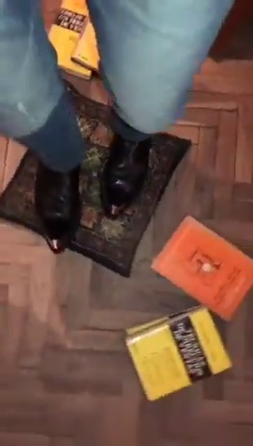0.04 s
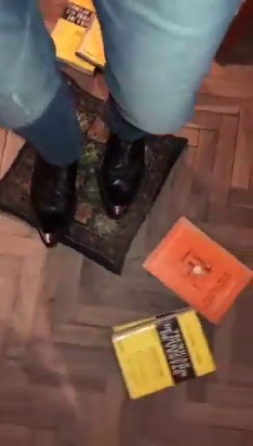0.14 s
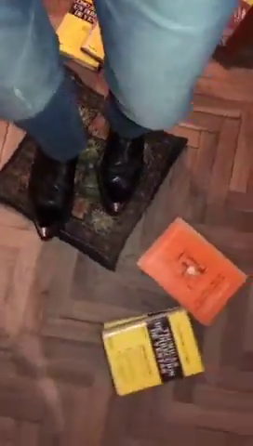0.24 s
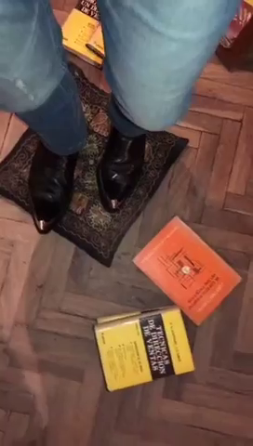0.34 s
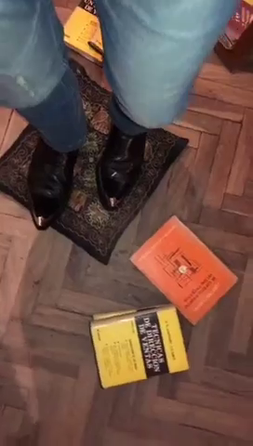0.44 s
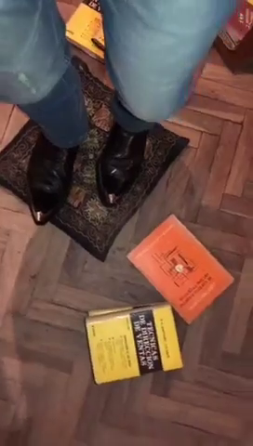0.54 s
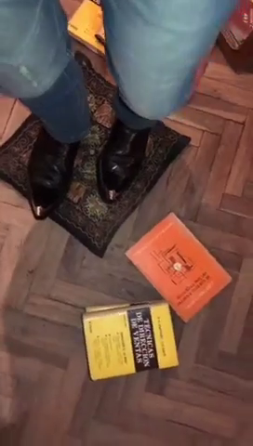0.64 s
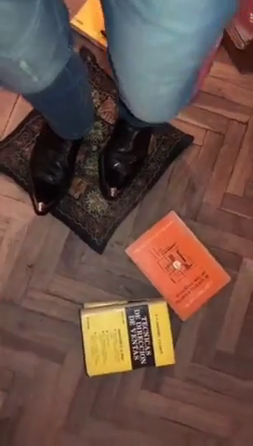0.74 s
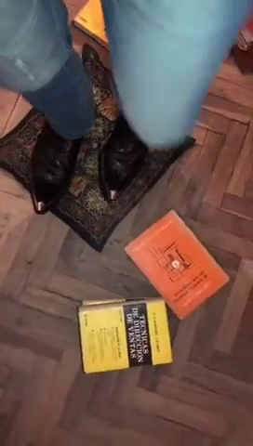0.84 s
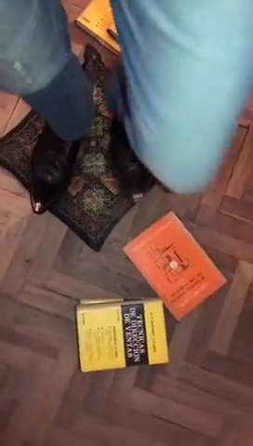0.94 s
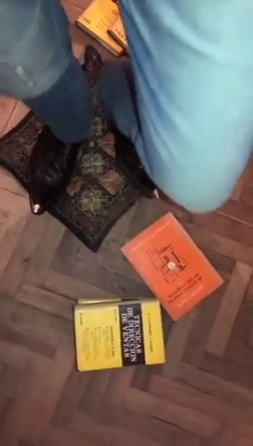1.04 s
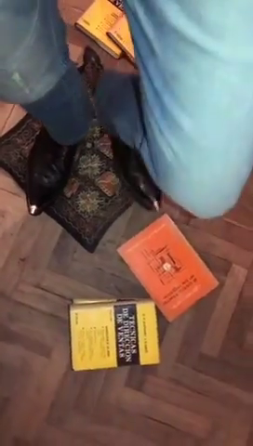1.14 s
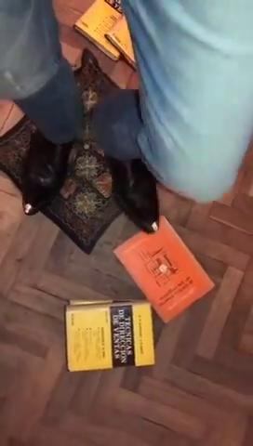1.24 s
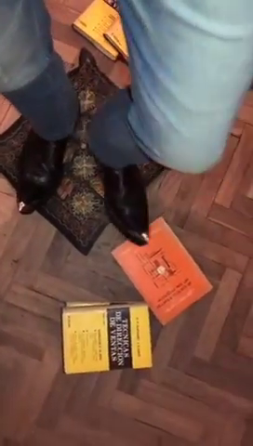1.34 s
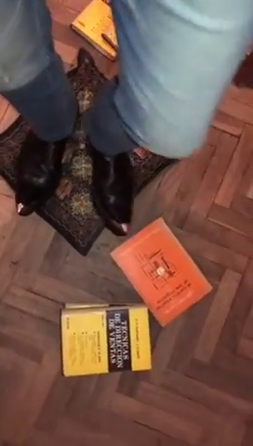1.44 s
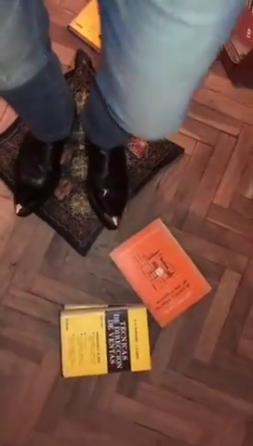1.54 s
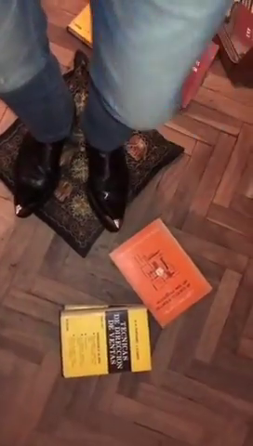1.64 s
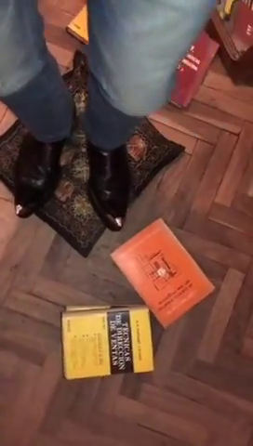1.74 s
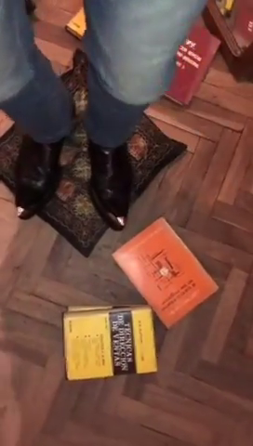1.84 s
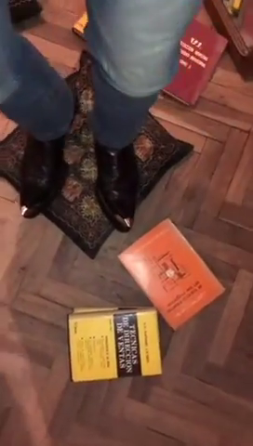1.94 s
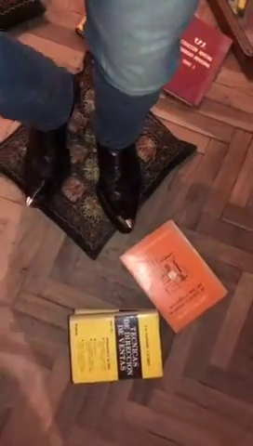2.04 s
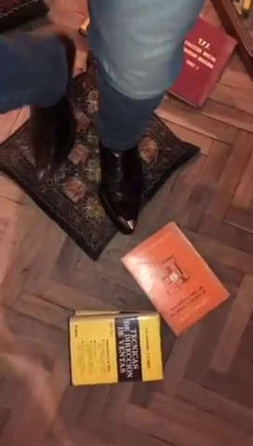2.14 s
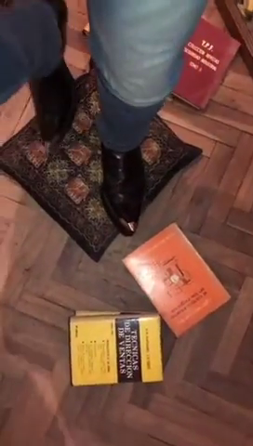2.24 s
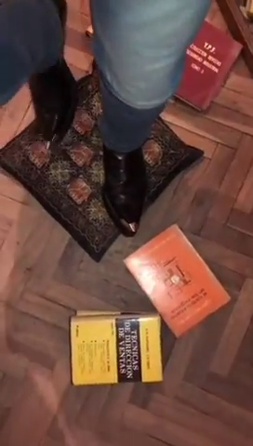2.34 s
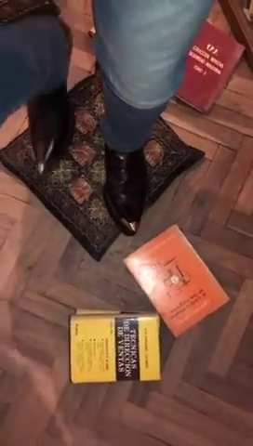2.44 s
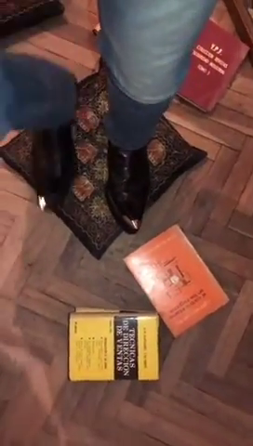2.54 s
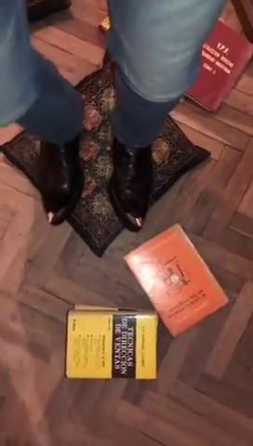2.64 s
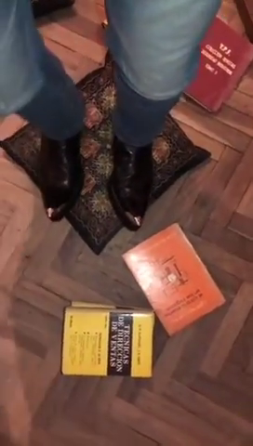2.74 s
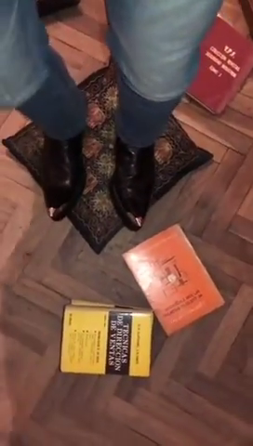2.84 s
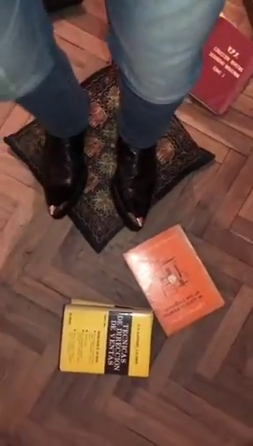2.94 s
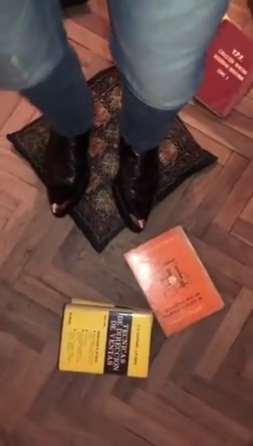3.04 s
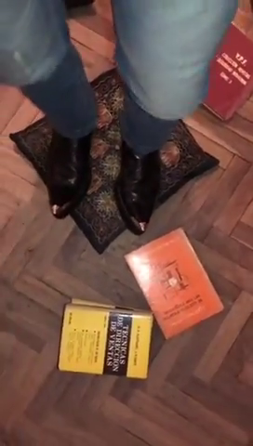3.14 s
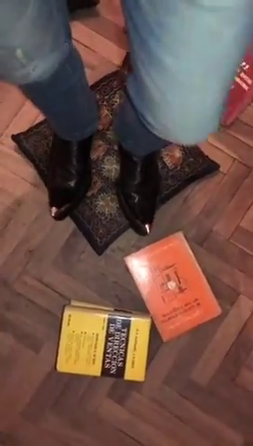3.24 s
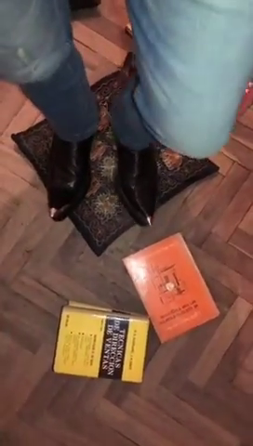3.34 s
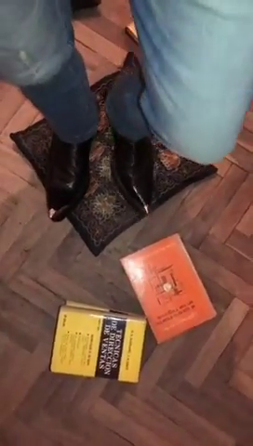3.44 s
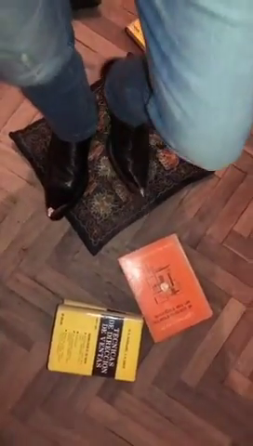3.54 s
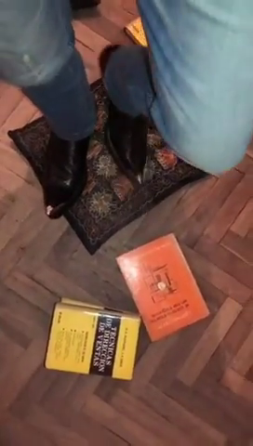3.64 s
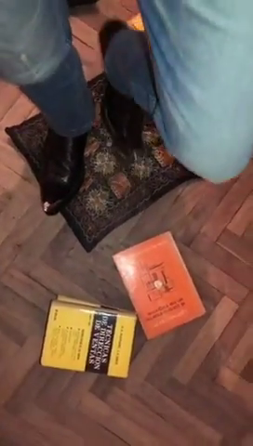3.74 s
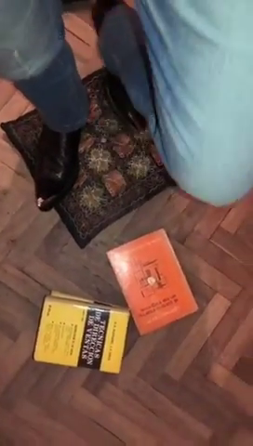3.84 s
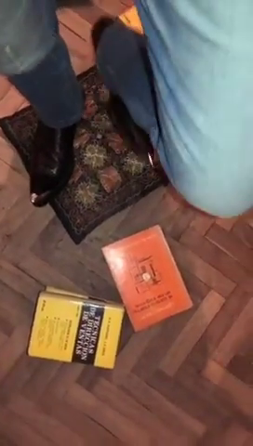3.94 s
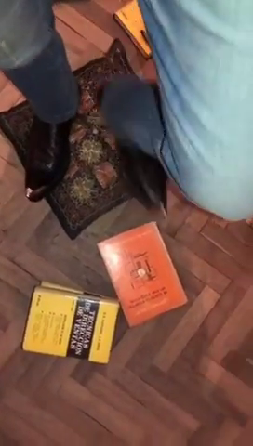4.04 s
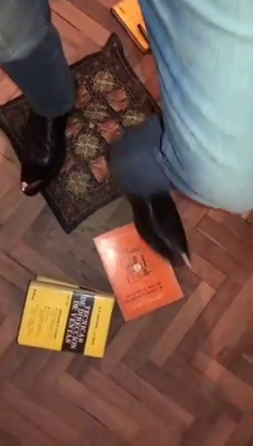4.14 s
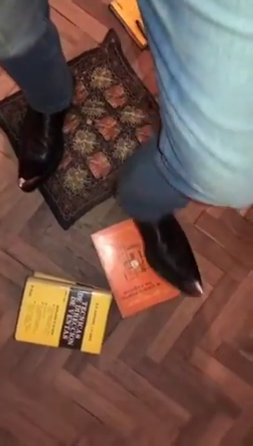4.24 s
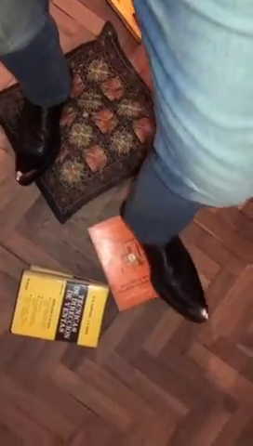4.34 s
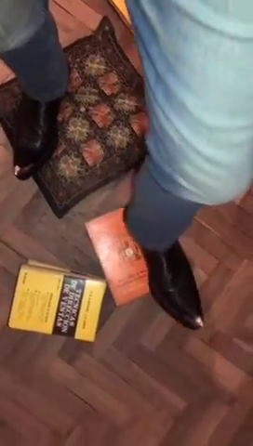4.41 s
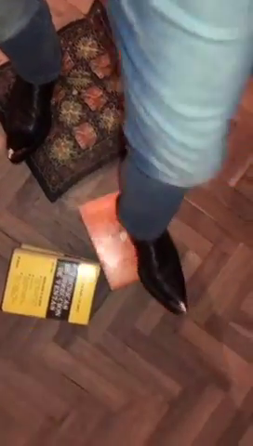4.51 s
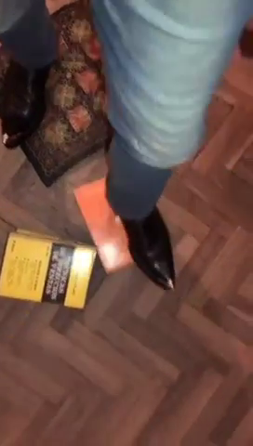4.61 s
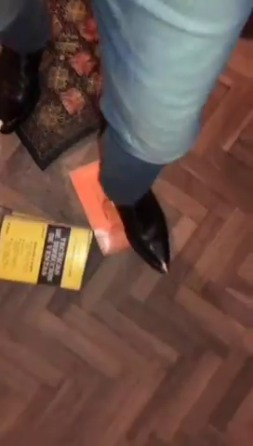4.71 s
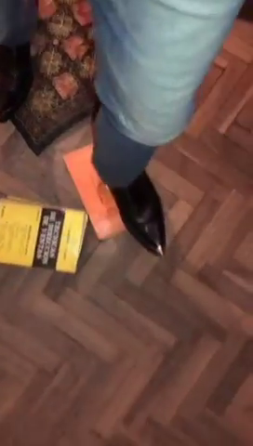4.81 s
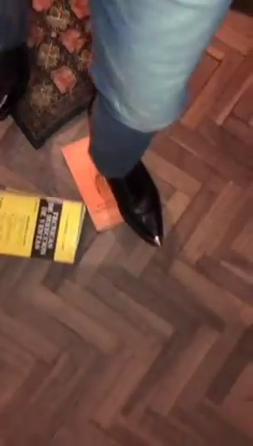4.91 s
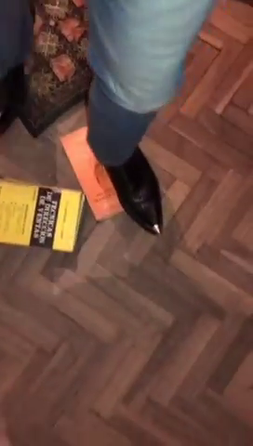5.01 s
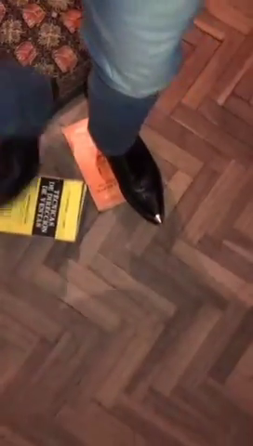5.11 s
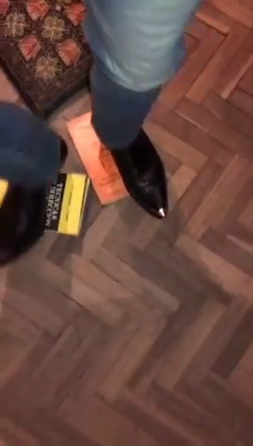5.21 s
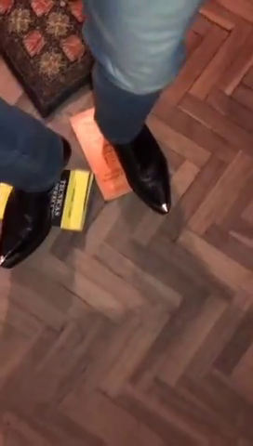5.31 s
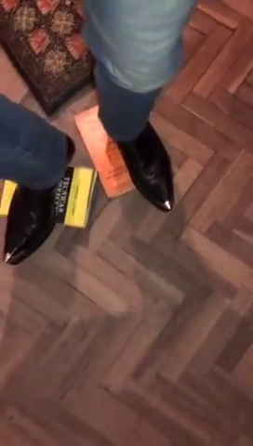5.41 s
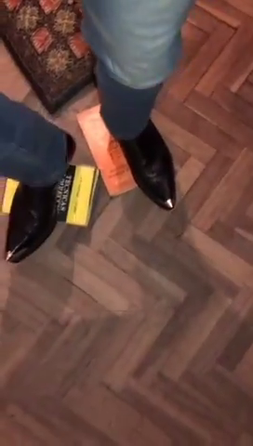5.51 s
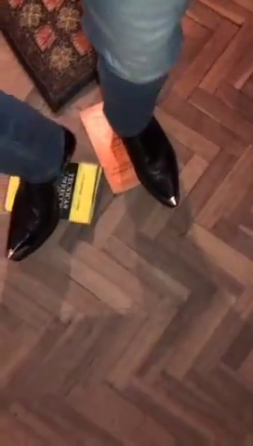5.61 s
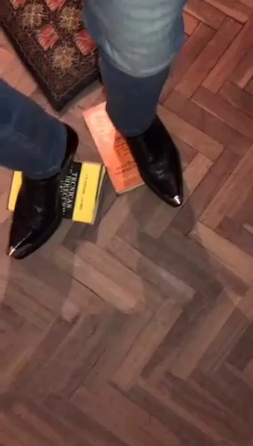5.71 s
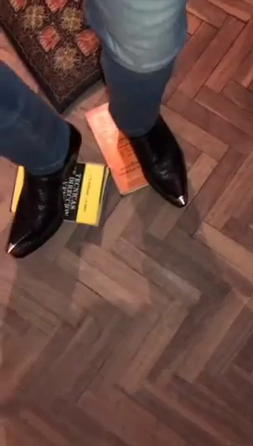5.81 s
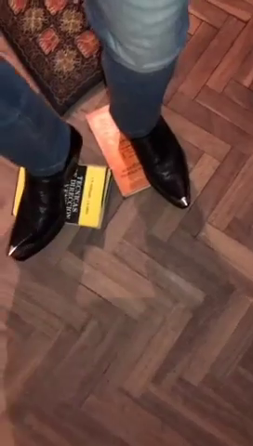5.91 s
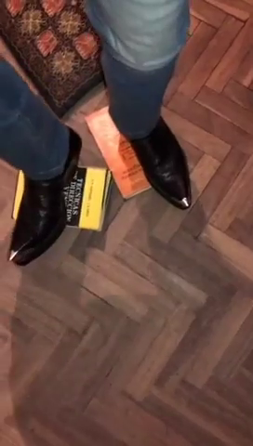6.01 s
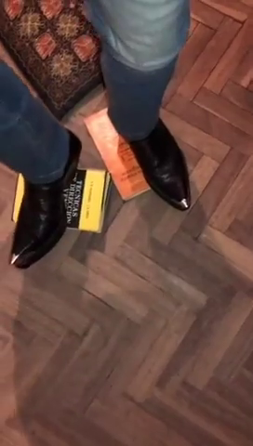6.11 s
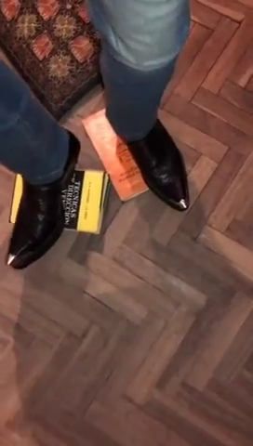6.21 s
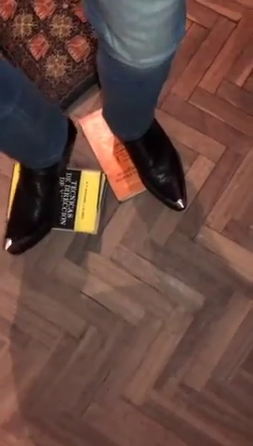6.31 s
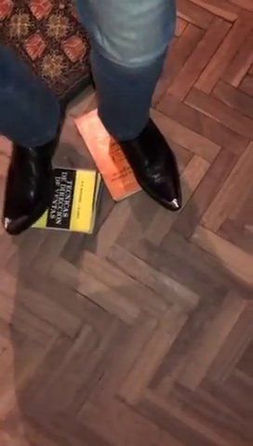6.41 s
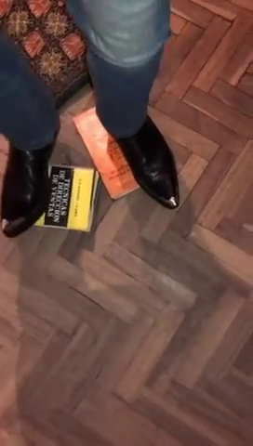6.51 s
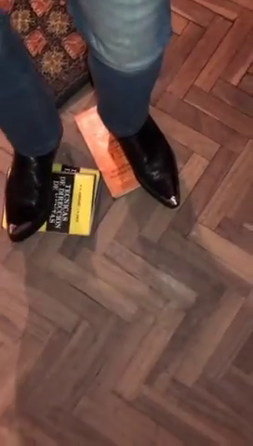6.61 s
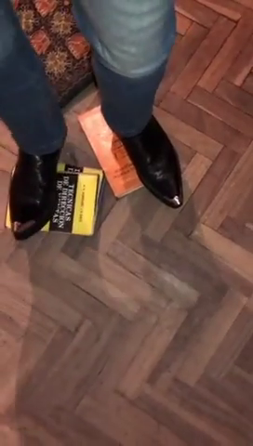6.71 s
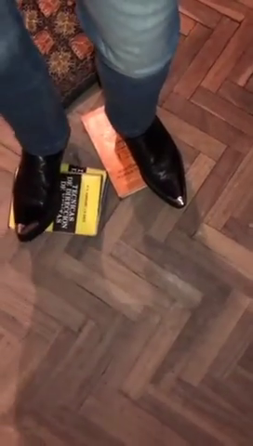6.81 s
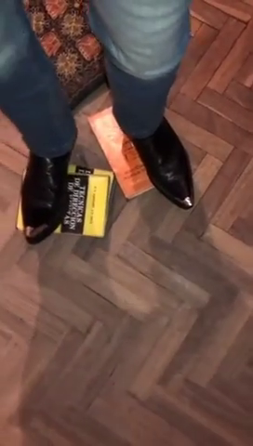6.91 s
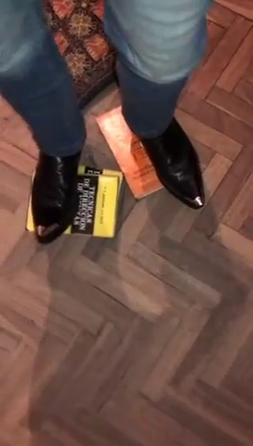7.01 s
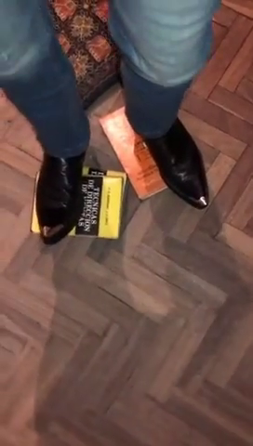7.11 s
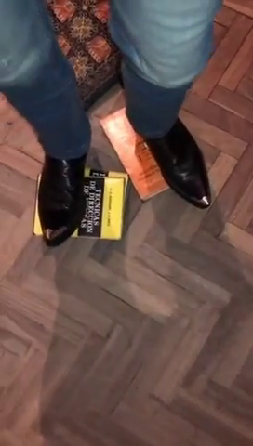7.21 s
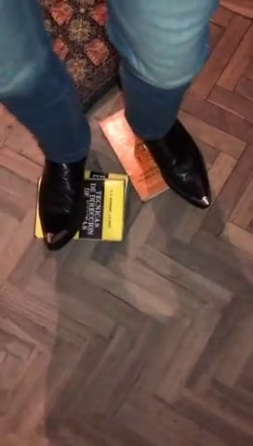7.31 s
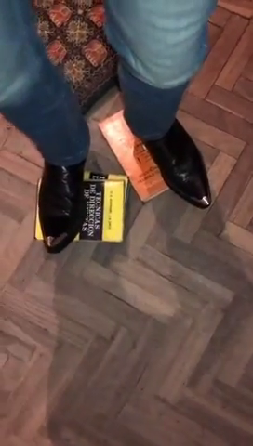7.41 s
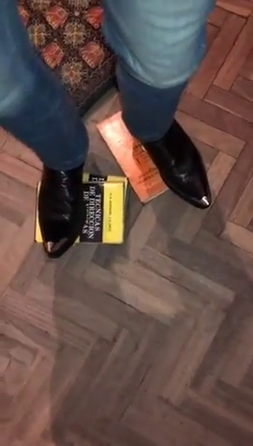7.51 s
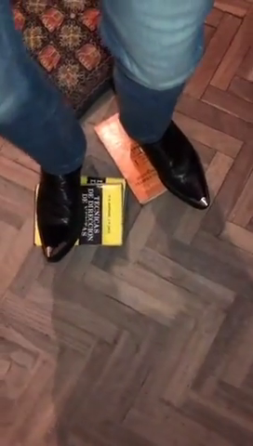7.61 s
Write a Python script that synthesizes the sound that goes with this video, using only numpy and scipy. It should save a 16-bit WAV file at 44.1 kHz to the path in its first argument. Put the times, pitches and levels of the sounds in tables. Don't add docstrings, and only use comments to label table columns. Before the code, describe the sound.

Soft cloth rustles and leather ticks in a quiet room, then three heel knocks through books into ringing floorboards, scuffs and one brief squeak.

```python
import sys
import numpy as np
from scipy import signal
from scipy.fft import rfft, irfft
from scipy.io import wavfile
from scipy.ndimage import uniform_filter1d

SR = 44100
rng = np.random.default_rng(int(sys.argv[2]) if len(sys.argv) > 2 else 0)


def boost(x):
    u = np.asarray(x, float) / 20
    return 10 ** u


def pcm_store(signal):
    levels = np.round(np.clip(np.atleast_2d(signal), -1, 1) * 32767)
    wavfile.write(sys.argv[1], SR, levels.astype(np.int16).T)


N = 337806


def rms_one(x):
    return x / np.sqrt(np.mean(x ** 2) + 1e-20)


def butter(x, order, hz, kind):
    return signal.sosfilt(signal.butter(order, hz, kind, fs=SR, output="sos"), x)


def coloured(x, spectrum):
    hz, db = np.transpose(spectrum)
    axis = np.log(np.maximum(np.fft.rfftfreq(N, 1 / SR), 1))
    gain = boost(np.interp(axis, np.log(hz), db, left=-80, right=-80))
    return rms_one(irfft(rfft(x) * gain, N))


def resonances(x, peaks):
    out = 0
    for k, (hz, width, db) in enumerate(peaks):
        r = np.exp(-np.pi * width / SR)
        push = [(1 - r * r) / 2, 0, (r * r - 1) / 2]
        memory = [1, -2 * r * np.cos(2 * np.pi * hz / SR), r * r]
        out = out + (-1) ** k * boost(db) * signal.lfilter(push, memory, x)
    return out


def ring(clicks, hz, t60):
    r, w = boost(-60 / (t60 * SR)), 2 * np.pi * hz / SR
    return signal.lfilter([0, np.sin(w)], [1, -2 * r * np.cos(w), r * r], clicks + 1e-18)


def snap(burst, db, top_hz):
    dying = burst * np.exp(-np.arange(len(burst)) / SR / 0.003)
    return boost(db) * butter(dying, 2, [600, top_hz], "band")


def grains(spread_db):
    return rng.standard_normal(N) * boost(spread_db * np.minimum(rng.exponential(1, N), 4))


def swells(rows, lag=0.):
    t, power = np.arange(0, N, 32) / SR - lag, 1e-15
    for s, hold, db, rise, fall in rows:
        early = np.maximum(s - t, 0) / max(rise, 1e-3)
        late = np.maximum(t - s - hold, 0) / max(fall, 1e-3)
        power = power + boost(db - 20 * (early + late)) ** 2
    return np.interp(np.arange(N) / 32, np.arange(len(t)), power)


def step(contacts, modes):
    force, crack, t = np.zeros(N), np.zeros(N), np.arange(1024) / SR
    noise = rng.standard_normal((8, len(t)))
    for (s, db, hard_hz, crack_db), burst in zip(contacts, noise):
        i = round(s * SR)
        now = slice(i, i + len(t))
        push = t * np.exp(-2 * np.pi * hard_hz * t)
        rebound = t * np.exp(-2 * np.pi * hard_hz * t / 6)
        force[now] += boost(db) * (push / push.sum() - 0.91 * rebound / rebound.sum())
        crack[now] += snap(burst, crack_db, 1500 + 1.88 * hard_hz)
        crack[now] += snap(burst, crack_db - 15, top_hz=14700)
    body = 0
    for k, (hz, db, t60) in enumerate(modes):
        body = body + (-1) ** (k // 2) * boost(db) * ring(force, hz, t60)
    return crack + butter(body, 2, 50, "high")


# start in seconds, blow in dB, hardness in Hz, crack in dB.
FIRST_STEP = [(4.658, -36.5, 2730, -35.5), (4.6594, -29, 1000, -34), (4.6663, -37, 700, -34),
              (4.6733, -37, 606, -41), (4.6815, -40, 790, -48), (4.7218, -37, 250, -48)]
SECOND_STEP = [(5.303, -33.5, 3100, -27.5), (5.3083, -27, 1200, -25), (5.314, -31, 800, -43),
               (5.3205, -27, 200, -44), (5.3232, -30, 900, -43), (5.337, -40, 400, -46),
               (5.365, -31, 600, -36)]
THIRD_STEP = [(6.598, -35, 3120, -36.5), (6.6005, -65.5, 1200, -42), (6.607, -38, 500, -45.5),
              (6.618, -37, 141, -55), (6.6485, -38, 2000, -36), (6.652, -52, 500, -58),
              (6.661, -40, 304, -55)]
# pitch in Hz, level in dB, time to fall 60 dB in seconds.
FIRST_RING = [(68, -4, 0.22), (142, -5, 0.45), (219, -17, 0.17), (290, 0, 0.2), (327, -9.5, 0.031),
              (400, -1, 0.15), (490, -10.5, 0.16), (590, 1, 0.034), (813, -22, 0.2), (950, 3.5, 0.034),
              (1280, -13, 0.058), (1600, -6, .04), (2700, 8.5, 0.0075)]
SECOND_RING = [(62, -1, 0.5), (76, 4, 0.24), (213.6, -8, 0.5), (155, -14, 0.4), (200, 5, 0.1),
               (305, -2, 0.3), (395, -14, 0.1), (422, -23, 0.4), (613, -15.5, 0.17), (693, -9.5, 0.14),
               (920, 2.5, 0.032), (1044, -8, 0.2), (1410, 0.5, 0.032), (1850, -23, 0.026)]
THIRD_RING = [(58.3, -14, 0.2), (75.2, 1, 0.23), (160.3, 5.5, 0.16), (398, -20, 0.33), (291, -21, 0.3),
              (435, 0.5, 0.02), (551, -6.5, 0.082), (800, -5, 0.03), (1000, 0.5, 0.026), (1400, 1.5, 0.014),
              (1870, -4, 0.018)]
# start in seconds, change in dB.
STILLING = [
    (4.684, -6),
    (5.345, -6),
    (6.72, -2),
]


def steps():
    t, out = np.arange(N) / SR, 0
    played = [(FIRST_STEP, FIRST_RING), (SECOND_STEP, SECOND_RING), (THIRD_STEP, THIRD_RING)]
    for (contacts, modes), (s, db) in zip(played, STILLING):
        landed = np.clip((t - s) / 0.004, 0, 1)
        out = out + step(contacts, modes) * boost(db * landed)
    return out


# full level reached in seconds, hold in seconds,
# level in dB, rise in seconds per 20 dB, fall in seconds per 20 dB.
CLOTH_BRUSHES = [(.175, 0.038, -60.5, 0.12, 0.1556), (.952, 0.041, -59, 0.06, 0.07),
                 (2.2, 0.045, -55, 0.1151, 0.09), (3.74, 0.089, -60.5, 0.42, -0.03),
                 (3.85, 0.021, -68.5, 0.72, -0.58), (4.97, 0.012, -60.5, -0.03, 0.03),
                 (5.64, 0.0057, -71, -0.15, 0.12)]
SOLE_DRAGS = [
    (2.095, 0.078, -55, 0.094, 0.17),
    (2.624, 0.039, -58, 0.011, 0.044),
    (2.724, 0.0067, -62.5, 0.13, 0.058),
    (3.43, 0.18, -56.5, 0.23, 0.37),
    (7.6, .06, -74.5, 0.051, .1),
]
TROUSER_RUSTLES = [(.04, 0.036, -74.5, 0.22, 0.18), (1.09, 0.034, -73, 0.11, .15), (1.27, .08, -79, .1, .1),
                   (1.42, 0.034, -77.5, 0.3, .1), (1.64, 0.21, -76, .1, 0.34), (1.96, 0.094, -80, 0.15, .1),
                   (2.33, 0.067, -81, .1, .1), (2.79, .01, -74, .03, 0.081), (2.93, 0.011, -77, .02, 0.066),
                   (3.01, .015, -79, 0.022, 0.052), (3.1, .1, -82, 0.34, .2), (4.13, 0.19, -76, .2, .3),
                   (4.5, 0.15, -78, 0.23, 0.11), (4.91, 0.09, -68.5, 0.046, 0.12),
                   (5.02, .26, -75, 0.13, .05)]
LIGHT_WISPS = [(1.525, 0.055, -65.5, 0.09, 0.061), (3.66, 0.11, -63, 0.13, .1),
               (4.75, 0.068, -75.5, 0.042, .1), (4.697, .008, -66, .01, .03), (5.2, 0.11, -78, 0.07, 0.029),
               (5.625, 0.02, -74, .05, 0.027), (6.275, 0.0049, -73, 0.092, 0.018),
               (6.628, 0.0081, -53, 0.025, 0.1)]
LOADED_SCRAPES = [
    (1.52, 0.056, -57, 0.1, 0.084),
    (3.33, .08, -57, 0.15, 0.28),
    (5.545, .03, -77, 0.028, .05),
    (7.228, .01, -72, .1, .075),
]
FIRST_SETTLING = [
    (4.668, 0.0034, -53, 0.0037, 0.12),
    (4.78, 0.099, -77, 0.11, 0.18),
]
SECOND_SETTLING = [
    (5.314, 0.0023, -43, 0.0078, 0.033),
    (5.34, 0.013, -57.5, 0.017, 0.14),
    (5.49, 0.064, -80, 0.078, 0.13),
]
THIRD_SETTLING = [
    (6.606, .004, -57, 0.008, 0.02),
    (6.66, 0.013, -60, 0.041, 0.12),
    (6.77, 0.016, -74.5, 0.04, 0.12),
]
# boards, leather and fine hiss in dB relative to the rub,
# then the leather's centre in Hz.
BRUSH_TONE = (-3.5, -2, -0.5, 729)
DRAG_TONE = (-5, -3.5, -4.5, 823)
RUSTLE_TONE = (-6, -8, -2, 806)
WISP_TONE = (-19, -4.5, 3, 800)
SCRAPE_TONE = (-6.5, -4.5, -8.5, 858)
FIRST_SETTLING_TONE = (12.5, 5, -10, 530)
SECOND_SETTLING_TONE = (17.5, 8.5, -8, 658)
THIRD_SETTLING_TONE = (11, 1.5, -20, 532)
BOARD_PRESSES = [(1.0, 0.012, -60.5, -1, .06), (1.53, 0.07, -57, 0.07, .06), (2.23, 0.039, -77.5, 0, 0.5),
                 (2.12, 0.044, -55, -0.02, -0.12), (2.655, 0.0098, -61, 0.05, 0.12),
                 (3.39, 0.11, -51.5, 0.06, 0.14), (3.8, 0.036, -56, 0.5, -0.02), (4.48, .08, -75, -0.5, 1)]
# full level reached in seconds, hold in seconds, level in dB, fall in seconds per 20
# dB, centre in Hz.
LEATHER_CREAKS = [(0.204, 0.014, -55.5, 0.08, 507), (0.964, 0.0067, -63, 0.2, 670),
                  (1.49, 0.095, -60, 0.12, 960), (2.063, 0.1, -57.5, 0, 866),
                  (2.19, 0.054, -58, 0.16, 1130), (2.632, 0.012, -62.5, 0.15, 836),
                  (3.259, 0.024, -66, -0.25, 696), (3.758, 0.05, -56.5, -0.25, 950)]


def movements():
    slides = [(CLOTH_BRUSHES, BRUSH_TONE), (SOLE_DRAGS, DRAG_TONE), (TROUSER_RUSTLES, RUSTLE_TONE),
              (LIGHT_WISPS, WISP_TONE), (LOADED_SCRAPES, SCRAPE_TONE)]
    settling = [(FIRST_SETTLING, FIRST_SETTLING_TONE), (SECOND_SETTLING, SECOND_SETTLING_TONE),
                (THIRD_SETTLING, THIRD_SETTLING_TONE)]
    strokes = [(*kind, 0.023, 0.0062) for kind in slides] + [(*kind, 0, 0) for kind in settling]
    rub, press, flex, hiss, centre = 0, swells(BOARD_PRESSES), 0, 0, 0
    for rows, (boards_db, leather_db, hiss_db, hz), boards_lag, leather_lag in strokes:
        power = swells(rows)
        bend = swells(rows, leather_lag) * boost(2 * leather_db)
        rub = rub + power
        hiss = hiss + power * boost(2 * hiss_db)
        press = press + swells(rows, boards_lag) * boost(2 * boards_db)
        flex = flex + bend
        centre = centre + bend * np.log2(hz)
    for s, hold, db, fall, hz in LEATHER_CREAKS:
        bend = swells([(s, hold, db, 0.03, fall)])
        flex = flex + bend
        centre = centre + bend * np.log2(hz)
    return rub, press, flex, hiss, centre / flex


# pitch in Hz, width in Hz, level in dB.
BOOT_LEATHER = [(500, 88, 4), (632, 71, 3.5), (746, 260, -0.5), (870, 140, 0.5), (1055, 84, 5.5),
                (1200, 61, 0.5), (1310, 100, -2)]


def bending_leather(centre):
    slips, out, drive_power = grains(spread_db=5.0), 0, 0
    for hz, width, db in BOOT_LEATHER:
        drive = boost(db - 15.5 * np.abs(np.log2(hz) - centre))
        out = out + drive * rms_one(resonances(slips, [(hz, width, db)]))
        drive_power = drive_power + drive ** 2
    return out / np.sqrt(drive_power)


# frequency in Hz, level in dB per Hz.
RUB_COLOUR = [(880, -18), (1500, -8), (3920, -9), (4830, -9.5), (6240, -5.5), (9470, -2.5), (10500, -2),
              (13400, -4.5), (16000, -9)]
# pitch in Hz, width in Hz, level in dB.
BOARD_MODES = [(151.5, 21, 5.5), (221.5, 22, 2), (286.5, 53, 5), (400, 400, -8)]


def rubbing():
    rub, press, flex, hiss, centre = movements()
    rough = coloured(grains(spread_db=3.0), RUB_COLOUR)
    coarse = rms_one(butter(rough, 4, 4900, "low"))
    fine = rms_one(butter(rough, 4, 4900, "high"))
    boards = resonances(grains(spread_db=6.5), BOARD_MODES)
    boards = rms_one(butter(boards, 2, [110, 520], "band"))
    layers = [(coarse, rub), (boards, press), (bending_leather(centre), flex), (fine, hiss)]
    return sum(uniform_filter1d(np.sqrt(power), size=300) * x for x, power in layers)


# full level reached in seconds, hold in seconds, level in dB, pitch in Hz, width in Hz.
SOLE_SKIDS = [(.2, .02, -63, 5800, 900), (.2, .015, -63.5, 1250, 200), (0.237, 0.014, -68, 2300, 400),
              (1.483, .015, -60, 2900, 1200), (1.5, .07, -62, 520, 100), (2.09, .05, -58, 280, 50),
              (1.52, .07, -60, 2780, 1200), (1.51, .04, -66, 4100, 400), (1.555, 0.046, -63, 1054, 100),
              (2.07, .08, -64, 3500, 900), (2.085, .08, -58, 866, 120), (2.2, .05, -64, 6100, 900),
              (2.21, .07, -60, 1126, 150), (2.25, 0.046, -63, 622, 60), (2.629, 0.035, -61.5, 800, 200),
              (3.37, .06, -63.5, 3900, 1200), (3.38, 0.13, -65.5, 2500, 500), (3.6, .06, -67, 6200, 900),
              (3.62, .04, -69, 3900, 400), (3.76, 0.057, -70, 3900, 600), (3.748, 0.074, -61.5, 1200, 300),
              (3.78, 0.054, -70, 6600, 500), (4.968, .012, -68, 4000, 400), (4.983, .01, -66, 1450, 250),
              (5.315, .008, -51, 6350, 1500), (5.44, .025, -55, 330, 50), (5.49, .07, -54, 212, 30),
              (5.5, .04, -61, 320, 40), (5.508, .02, -73, 2800, 250), (5.545, .028, -73, 2650, 500),
              (5.555, .02, -76, 6800, 900), (5.612, .006, -71, 2800, 500), (5.628, .018, -69, 5360, 1300),
              (6.624, .016, -51.5, 6600, 1800), (6.631, .008, -54, 2760, 400),
              (7.215, 0.038, -70, 2950, 700), (7.268, .02, -76, 3050, 300)]


def skids():
    out, grit = 0, grains(spread_db=4.0)
    for s, hold, db, hz, width in SOLE_SKIDS:
        peak = [(hz, max(width, 30), 0)]
        power = swells([(s, hold, db, 0.025, 0.034)])
        out = out + np.sqrt(power) * rms_one(resonances(resonances(grit, peak), peak))
    return out


# start in seconds, ring in dB, pitch in Hz,
# time to fall 60 dB in seconds, snap in dB.
LEATHER_TICKS = [(2.086, -50, 175.5, 0.27, -60), (2.249, -58, 634, 0.21, -60),
                 (2.673, -64, 700, 0.023, -61), (2.797, -60.5, 1200, 0.017, -62),
                 (2.93, -62, 1100, 0.037, -64), (3.011, -61, 874, 0.066, -63),
                 (3.019, -69, 1400, 0.056, -57.5), (3.812, -47.5, 142, 0.17, -70),
                 (3.888, -56, 136.5, 0.28, -75), (4.169, -76, 2490, .02, -60),
                 (5.507, -64, 2860, 0.017, -53), (5.55, -69, 2700, 0.069, -63),
                 (5.613, -70, 2700, .03, -64), (5.644, -57.5, 1200, 0.038, -56),
                 (6.204, -67, 1600, 0.023, -58), (7.041, -65, 594, 0.049, -70),
                 (7.088, -64, 1280, .04, -64), (7.095, -60, 201, 0.071, -60), (7.45, -65, 756, 0.056, -85),
                 (7.594, -69, 2050, 0.087, -61)]


def ticks():
    out, noise = np.zeros(N), rng.standard_normal((24, 1024))
    for (s, db, hz, t60, snap_db), burst in zip(LEATHER_TICKS, noise):
        click = np.zeros(SR // 2)
        click[0] = boost(db)
        tick = ring(click, hz, t60)
        tick += 0.7 * ring(click, 1.27 * hz, t60)
        tick += 0.6 * ring(click, 1.7 * hz, t60 / 2)
        tick[:len(burst)] += snap(burst, snap_db, top_hz=5230)
        i = round(s * SR)
        out[i:i + len(tick)] += tick[:N - i]
    return out


# time in seconds, slips per second, level in dB, unevenness from 0 to 1.
SQUEAK_COURSE = [(7.134, 1000, -88, 0.03), (7.145, 960, -63, 0.02), (7.163, 810, -63, .025),
                 (7.176, 700, -57, .04), (7.193, 870, -63, .05), (7.212, 720, -60, 0.2),
                 (7.23, 600, -58, .25), (7.256, 570, -57.5, 0.25), (7.28, 700, -84, .2)]
# pitch in Hz, width in Hz, level in dB.
SQUEAKING_LEATHER = [(695, 68, 0.5), (950, 120, -2), (1650, 470, -7.5), (2530, 140, -1), (3030, 290, -5),
                     (3230, 180, -2.5), (3820, 300, -10), (4400, 250, -14)]


def squeak():
    t, slips = np.arange(N) / SR, 0
    times, *columns = np.transpose(SQUEAK_COURSE)
    per_s, db, uneven = [np.interp(t, times, column) for column in columns]
    for faster, fold_db in [(1, 0), (1.13, -12)]:
        wobble = rms_one(signal.lfilter([1], [1, -.98], rng.standard_normal(N)))
        turns = np.cumsum(faster * np.maximum(per_s, 0) * (1 + uneven * wobble)) / SR
        pulses = np.diff(np.floor(turns), prepend=0)
        slips = slips + boost(fold_db) * pulses * (1 + 3 * uneven * rng.standard_normal(N))
    rubbing_now = (t > times[0]) & (t < times[-1])
    return 20 * boost(db) * rubbing_now * resonances(slips + 1e-18, SQUEAKING_LEATHER)


# octave centre in Hz, time to fall 60 dB in seconds.
ROOM_DECAY = [(90, 1), (180, 0.46), (350, 0.42), (700, 0.37), (1400, 0.25), (2800, 0.18), (5600, 0.091),
              (11000, 0.29)]


def room(x):
    t, echoes = np.arange(SR) / SR, 0
    for hz, t60 in ROOM_DECAY:
        octave = butter(rng.standard_normal(SR), 2, [hz / np.sqrt(2), hz * np.sqrt(2)], "band")
        echoes = echoes + octave * boost(-60 * t / t60) / np.sqrt(t60 * SR / 13.8)
    build_up = 1 - np.exp(-t / 0.021)
    return signal.fftconvolve(x, echoes * build_up)[:N]


# pitch in Hz, width in Hz, level in dB.
RUMBLE_TONES = [(40.8, 29, -4.5), (54.8, 4.7, 3.5), (77.3, 10, -12.5)]
# full level reached in seconds, hold in
# seconds, level in dB, rise in seconds per 20 dB, fall in seconds per 20 dB.
JOIST_SWAYS = [(.25, 0.066, -68, 2, 0.5), (1.64, .05, -69, 2, 0.5), (2.12, 0.46, -66.5, -5, 0.3),
               (4.76, 0.087, -62.5, 0.7, 1.5), (5.42, 0.03, -42, 0.09, 0.13), (5.7, 0.42, -63.5, 0.5, 2.5),
               (6.8, .02, -59, 0.4, 0.1), (7.2, 0.088, -66, 0.2, 1), (7.62, .05, -61.5, -0.3, .2)]


def rumble():
    hum = resonances(rng.standard_normal(N), RUMBLE_TONES)
    hum = rms_one(resonances(hum, [(60.5, 31, 0)]))
    r = np.exp(-2 * np.pi * 1.1 / SR)
    drift = rms_one(signal.lfilter([1], [1, -2 * r, r * r], rng.standard_normal(N + SR))[SR:])
    steady_db = -72.5 + 0.5 * drift
    return hum * np.sqrt(boost(2 * steady_db) + swells(JOIST_SWAYS))


# frequency in Hz, level in dB per Hz.
HISS_COLOUR = [(53, -26), (90, -7), (196, -5), (239, -12), (310, -13), (769, -21.5), (896, -20.5),
               (956, -19.5), (1020, -21), (1440, -24), (4170, -28), (13200, -30.5), (16000, -33.5)]


def microphone_hiss():
    return boost(-68.5) * coloured(rng.standard_normal(N), HISS_COLOUR)


WHINE_LEVELS = [-91.5, -91.5, -92.5, -91.5, -91, -92.5, -93, -99, -99, -100, -99, -100, -99, -101]


def electronic_whine():
    phase, out = 2 * np.pi * 1009 * np.arange(N) / SR, 0
    for k, db in enumerate(WHINE_LEVELS):
        out = out + np.sqrt(2) * boost(db) * np.sin((k + 1) * phase + k * k)
    return out


def scene():
    knocks = steps() + ticks() + squeak()
    background = rumble() + microphone_hiss() + electronic_whine()
    return (knocks + boost(-12) * room(knocks) + rubbing() + skids() + background)[None]


def band_limit(x):
    return signal.sosfilt(signal.butter(12, 16430, fs=SR, output="sos"), x)


# frequency in Hz, width in Hz, depth in dB.
HOUSING_NOTCHES = [(5000, 980, -3.5), (7670, 1150, -3), (10440, 1200, -6)]


def record(dry):
    x = dry[0]
    for hz, width, db in HOUSING_NOTCHES:
        x = x - (1 - boost(db)) * resonances(x, [(hz, width, 0)])
    x = signal.sosfilt(signal.cheby2(16, 40, 15870, fs=SR, output="sos"), x)
    return band_limit(x[None])


dry = scene()
out = record(dry)
pcm_store(out)
```